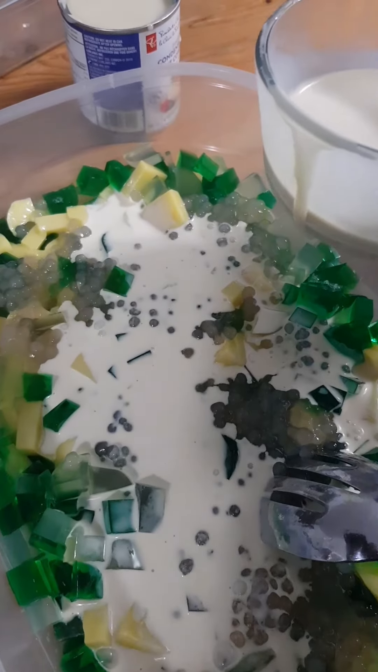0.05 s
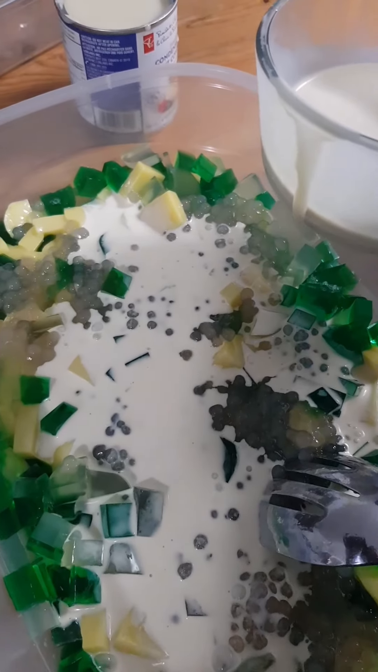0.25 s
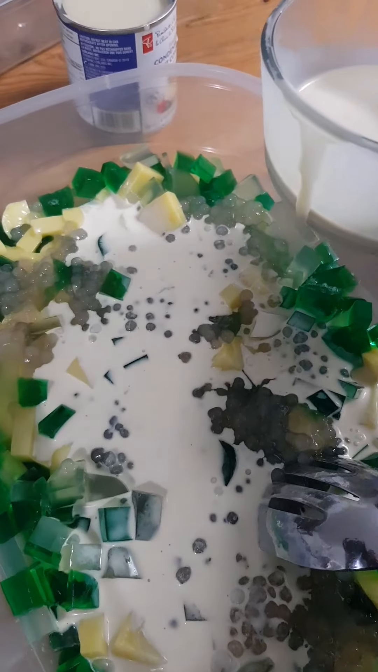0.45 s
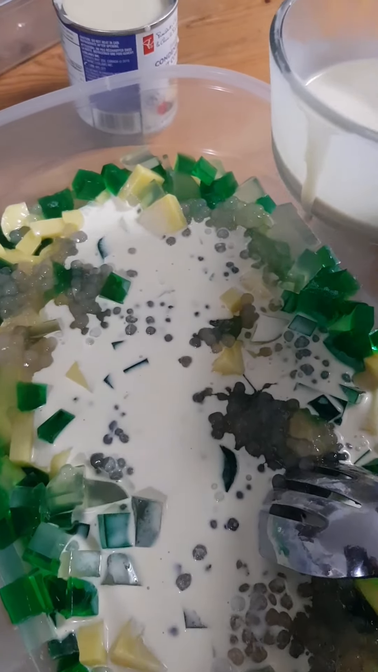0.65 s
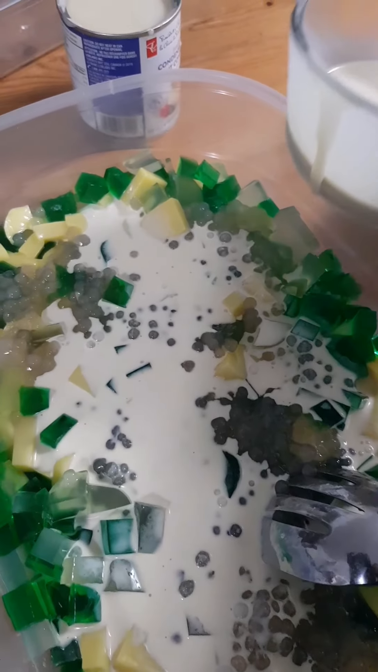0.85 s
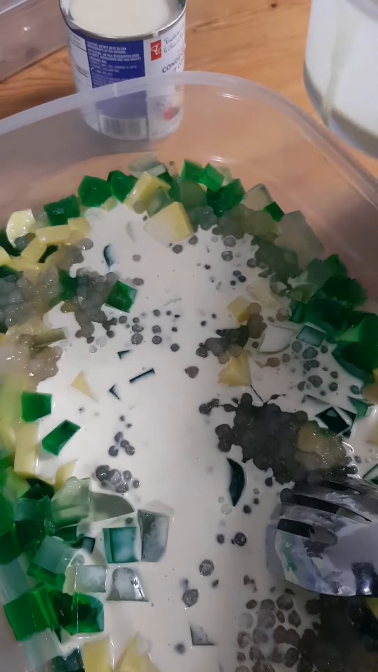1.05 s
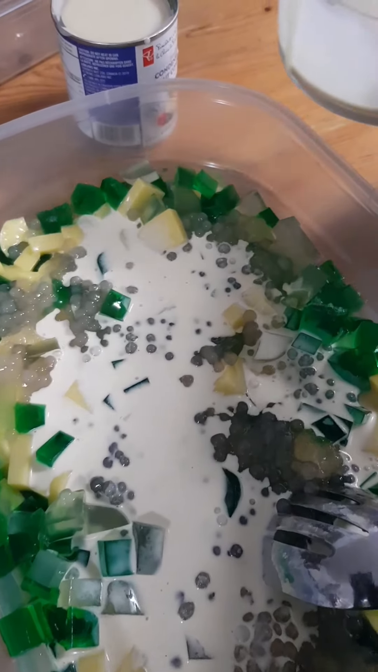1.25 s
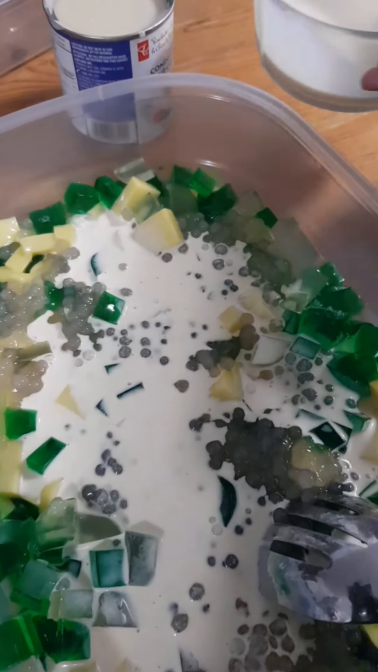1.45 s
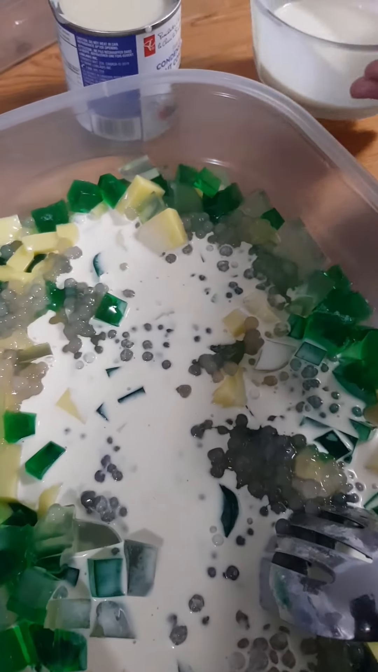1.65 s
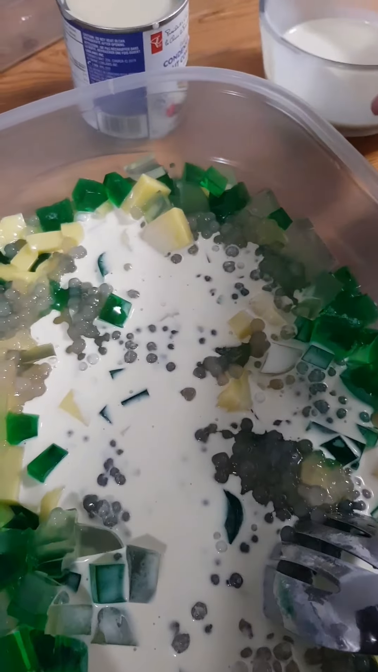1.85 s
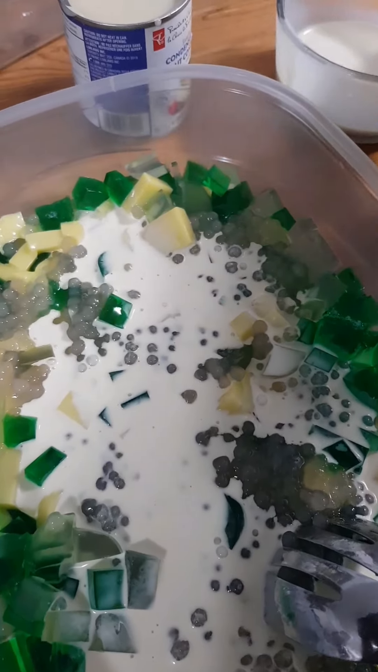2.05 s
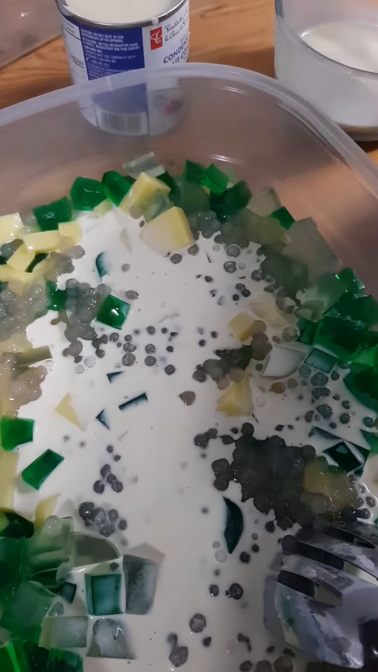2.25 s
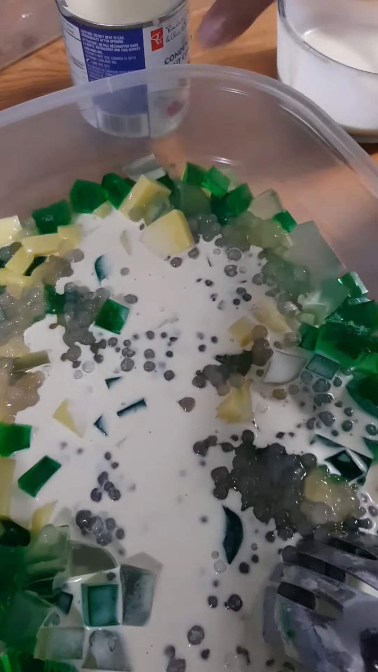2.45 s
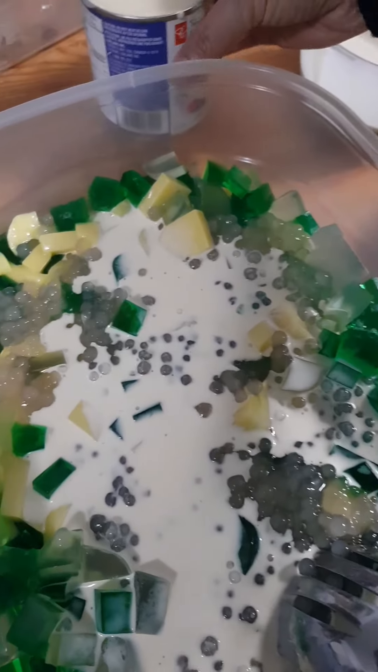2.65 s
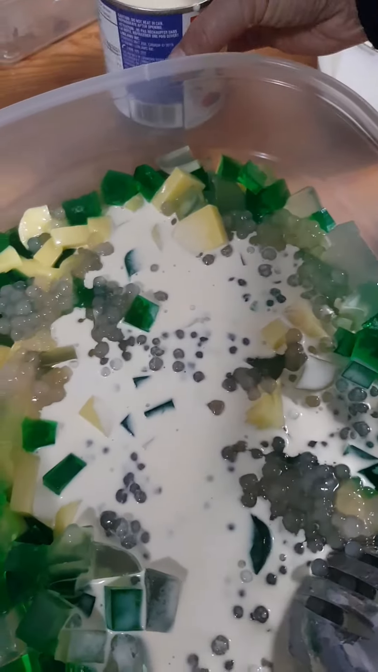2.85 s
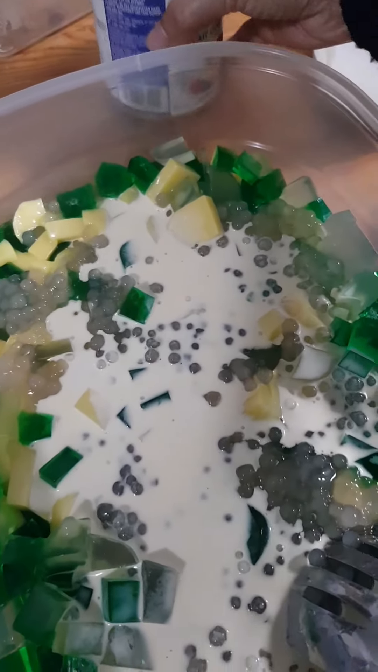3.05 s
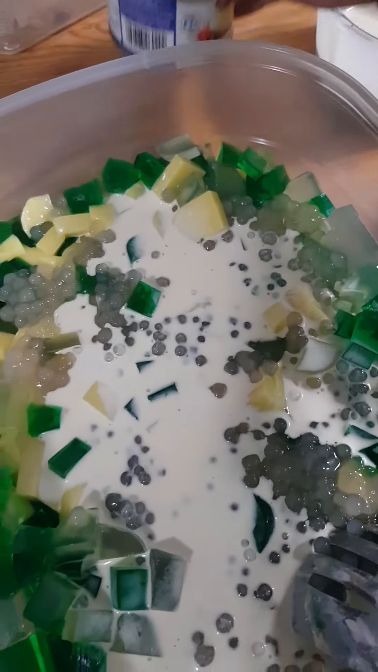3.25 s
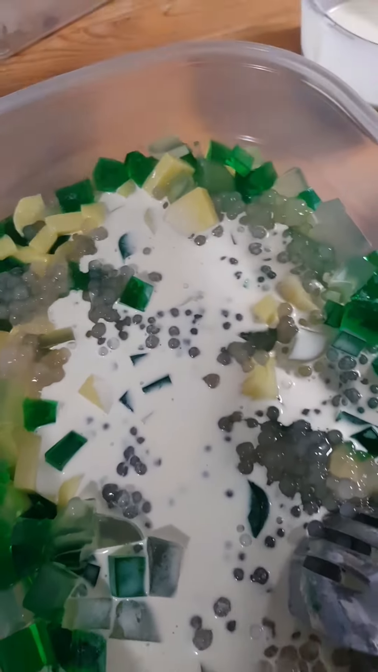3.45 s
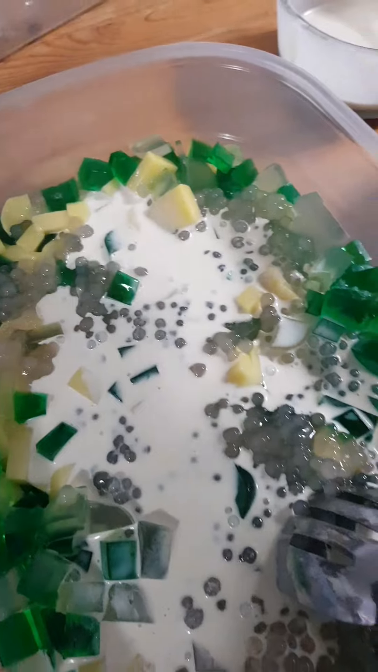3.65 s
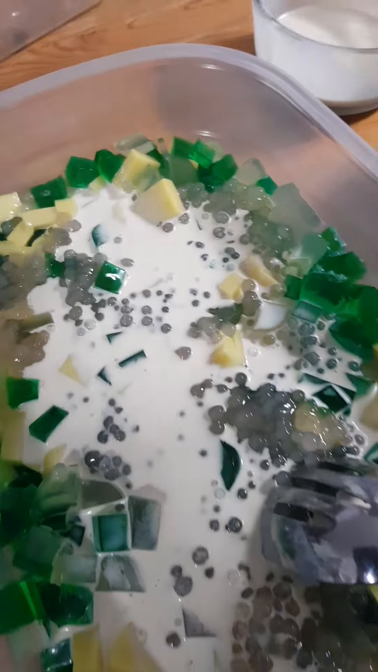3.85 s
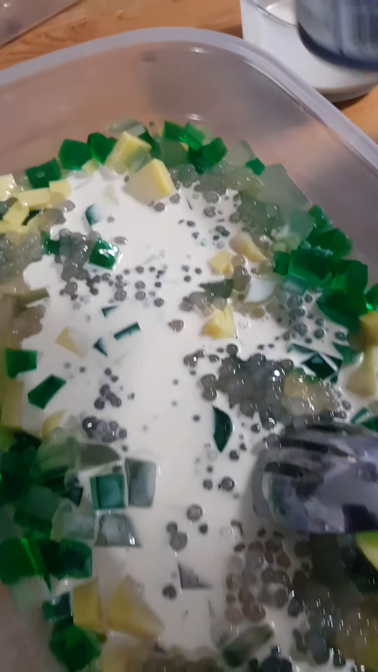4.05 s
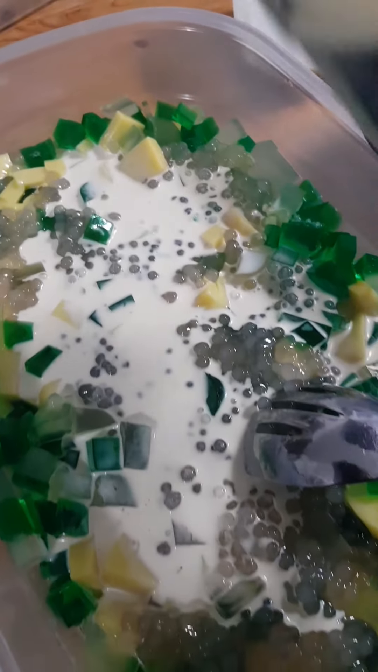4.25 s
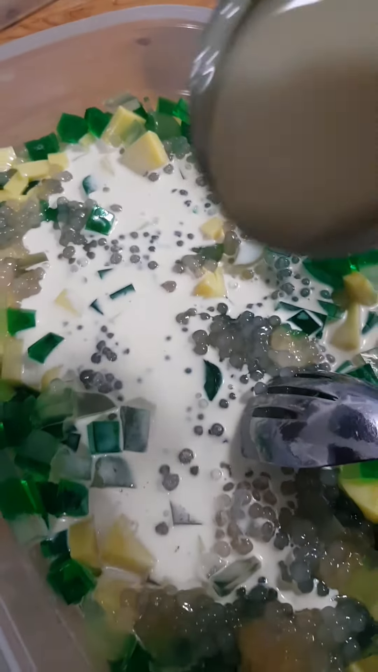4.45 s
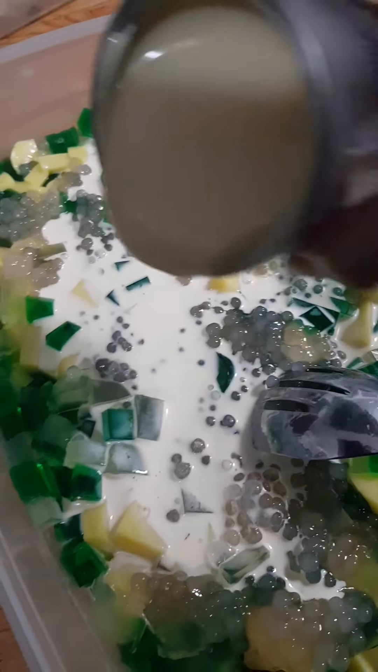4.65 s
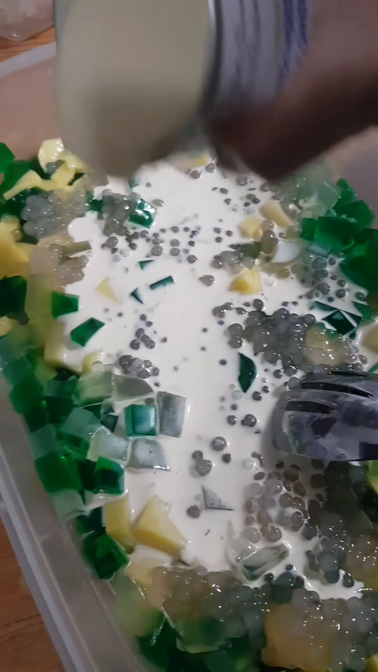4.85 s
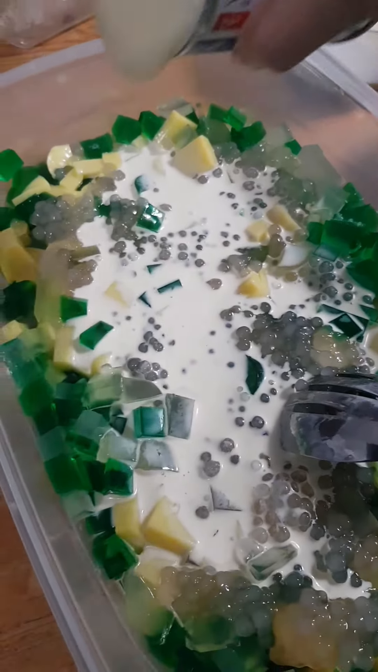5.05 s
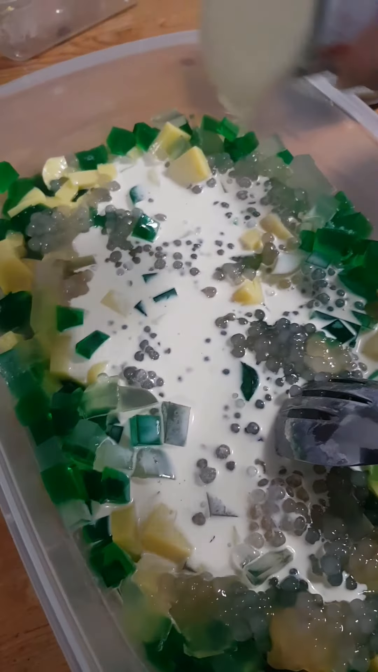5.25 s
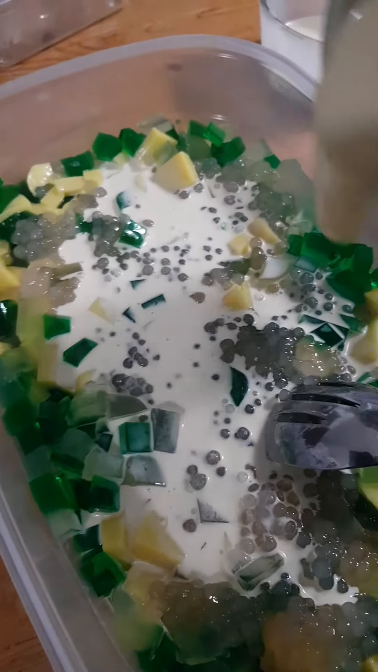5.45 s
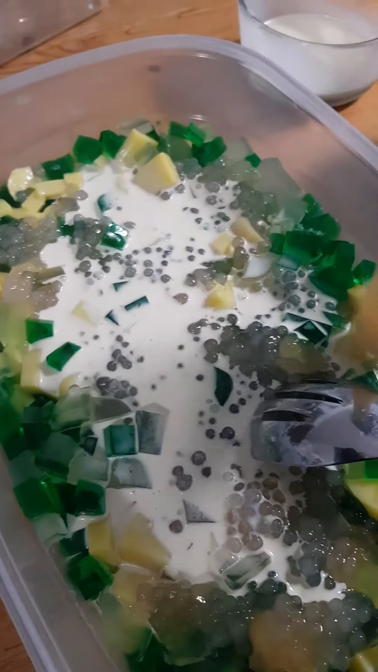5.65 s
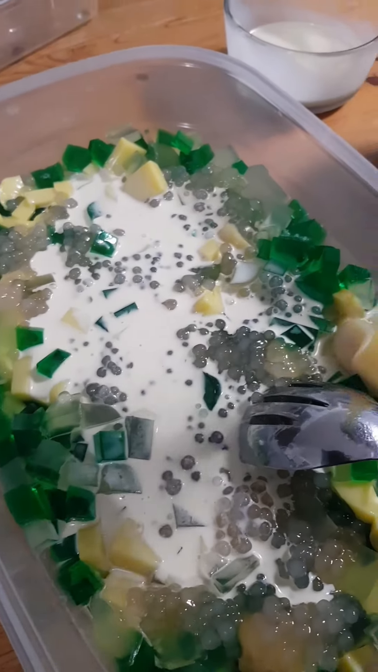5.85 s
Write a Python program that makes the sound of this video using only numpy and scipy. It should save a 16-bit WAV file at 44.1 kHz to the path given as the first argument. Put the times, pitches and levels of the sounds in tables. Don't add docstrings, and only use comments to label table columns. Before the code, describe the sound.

A quiet small kitchen, heard in stereo from close to the edge of a wooden table. A low, gently fluctuating fridge drone and soft hiss run throughout, with an extremely faint high whistle at times. Around 1.15 s a sleeve slides softly, and at 1.6 s there is a tiny glass tick. At 1.87 s a full glass bowl lands: one loud, abrupt, woody knock with a slight gritty edge, dying in about a tenth of a second. Softer rocking thuds follow at 1.89-2.1 s, the last ones bunched together. At 2.55-2.59 s fingers meet an open tin: a crisp double click, thin and hollow. A dull rub follows near 3 s. After the knock the background sinks slightly, recovering just after 4.1 s. Faint rubs and muted thin-metal dents occur at 4.2-4.45 s, then tiny ticks and airy brushing around 5.7-5.9 s. Hard walls add a short, dense echo.

```python
import sys
import numpy as np
from scipy import signal
from scipy.fft import rfft, irfft
from scipy.io import wavfile
from scipy.ndimage import uniform_filter1d

SR = 44100
rng = np.random.default_rng(int(sys.argv[2]) if len(sys.argv) > 2 else 0)


def store_pcm(level_fs):
    pcm = np.round(np.clip(level_fs, -1, 1) * 32767).astype(np.int16)
    wavfile.write(sys.argv[1], SR, np.atleast_2d(pcm).T)


def volts_from_db(level):
    exponent = np.asarray(level, float) / 20
    return 10 ** exponent


N = 261072


def on_log(table, hz, column):
    t = np.array(table, float)
    return np.interp(np.log(np.maximum(hz, 1)), np.log(np.maximum(t[:, 0], 1)), t[:, column])


def level(x, db):
    return x * volts_from_db(db) / np.sqrt(np.mean(x ** 2))


def walk(rate):
    k = int(SR / rate)
    held = np.repeat(rng.standard_normal(N // k + 1), k)
    return uniform_filter1d(uniform_filter1d(held, k), k)[:N]


# pitch_hz, likeness (0-1)
STEREO_LIKENESS = [(60, 0.5), (130, 0.86), (290, 0.9), (640, 0.3), (1410, 0), (3100, 0), (6820, 0),
                   (15000, 0)]


def pair(n, shape):
    hz = np.arange(n // 2 + 1) * SR / n
    likeness = np.clip(on_log(STEREO_LIKENESS, hz, column=1), 0, .99)
    share = np.sqrt([(1 + likeness) / 2, (1 - likeness) / 2])
    mid, side = rfft(rng.standard_normal((2, n))) * shape(hz) * share
    return irfft(np.array([mid + side, mid - side]), n)


def octave_bell(hz, centre_hz, width_oct):
    return np.exp(-(np.log2(np.maximum(hz, 1) / centre_hz) / width_oct) ** 2)


def peak(centre_hz, width_hz):
    return lambda hz: 1 / (1 + ((hz - centre_hz) / width_hz * 2) ** 2) ** 1.1


def add(out, x, s):
    i = int(s * SR)
    out[:, i:i + x.shape[1]] += x[:, :N - i]


def sides(pan_db):
    return volts_from_db(np.array([[pan_db], [-pan_db]]) / 2)


def ramp(t, start, length):
    return np.clip((t - start) / length, 0, 1)


SHAFT_ORDERS = (1, 3, 5, 6, 7, 8, 12, 13, 15)
SHAFT_LEVELS_DB = (-62, -73, -68, -73, -66.5, -82, -89, -90, -90.5)
# pitch_hz, level_db (rms), flutter_db
CASING = [(210.9, -52.5, 2), (246.3, -66, 5), (158, -70.5, -2), (86, -67.5, 2.5), (43, -70, 3)]
# start_s, length_s, level_db (rms)
WHISTLE = [
    (-.05, .8, -97.5),
    (.5, 0.32, -94),
    (.8, .45, -96),
    (4.4, 0.24, -97),
]
# pitch_hz, level_db (per Hz)
RUMBLE = [(12, -49), (20, -38.5), (65, -3.5), (85, -9.5), (130, -15), (160, -12), (187, -2.5), (214, -8),
          (259, -8), (340, -13.5), (420, -14), (606, -25), (693, -28.5), (1020, -34.5), (2000, -52),
          (2600, -77.5), (4400, -120)]


def fridge():
    t = np.arange(N) / SR
    shaft_hz, whistle_hz, whistle_rest_db = 58.855, 5464, -106
    turn = 2 * np.pi * np.cumsum(shaft_hz * (1 + 0.00339 * walk(1.991))) / SR
    tones = np.zeros(N)
    for order, db in zip(SHAFT_ORDERS, SHAFT_LEVELS_DB):
        tones += volts_from_db(db + 2.8 * walk(5)) * np.sin(order * turn + 7 * rng.random())
    for hz, db, flutter_db in CASING:
        tones += volts_from_db(db + flutter_db * walk(6)) * np.sin(2 * np.pi * hz * t + .4 * walk(6))

    swells = sum(volts_from_db(db) * np.sin(np.pi * ramp(t, s, length)) for s, length, db in WHISTLE)
    whistle = (volts_from_db(whistle_rest_db) + swells) * volts_from_db(1.8 * walk(9)) * np.sin(2 * np.pi * whistle_hz * t)

    swell, rumble = walk(0.57), 0
    for centre in 22 * 2 ** np.arange(0, 7.1, .5):
        band = pair(N, lambda hz: volts_from_db(on_log(RUMBLE, hz, column=1)) * octave_bell(hz, centre, 0.362))
        rumble = rumble + band * volts_from_db(0.643 * swell + walk(1.6))
    return np.sqrt(2) * (tones * sides(2.0) + whistle) + level(rumble, -56.5) * sides(0.51)


# pitch_hz, level_db (per Hz)
HISS = [(590, -18), (1000, -16), (1340, -2.5), (1500, -2.5), (2360, -6.5), (4680, -9), (5500, -7.5),
        (8260, -17), (12000, 0), (14900, 0.5), (16000, -5)]


def microphone_hiss():
    return level(pair(N, lambda hz: volts_from_db(on_log(HISS, hz, column=1))), -70) * sides(.8)


# start_s, length_s, level_db, pitch_hz
RUBS = [
    (1.148, 0.495, -71.5, 726),
    (2.55, 0.16, -75, 11000),
    (2.708, 0.107, -78.5, 6177),
    (2.969, 0.1215, -65, 700),
    (4.2, 0.42, -74, 600),
    (4.411, .1, -73.5, 1540),
    (5.685, 0.266, -80, 7730),
    (5.737, 0.092, -78, 6300),
    (5.843, 0.056, -70, 1000),
]


def rubs():
    out = np.zeros((2, N))
    for s, length, db, centre_hz in RUBS:
        n = int(length * SR) // 2 * 2
        rub = level(pair(n, peak(centre_hz, 0.74 * centre_hz)), db)
        add(out, rub * np.hanning(n) * volts_from_db(walk(40)[:n]), s)
    return out


def strike(contacts):
    bursts, pings = np.zeros((2, 2, N))
    n = 4096
    t = np.arange(n) / SR
    ears_t = t - np.array([[0], [.0002]])
    for s, tick_db, body, pitch, place_db in contacts:
        for centre_hz, width_hz, t60, db, pan_db in body:
            burst = level(pair(n, peak(pitch * centre_hz, pitch * width_hz)), 0)
            ping = np.sin(2 * np.pi * pitch * centre_hz * ears_t)
            clear = 1 / (1 + (4 * width_hz / centre_hz) ** 4)
            attack = 1 - np.exp(-t / 0.00038)
            fade = sides(place_db + pan_db) * attack * volts_from_db(tick_db + db - 60 * t / t60)
            add(bursts, (1 - clear) * burst * fade, s)
            add(pings, clear * ping * fade, s)
    return bursts, pings


# pitch_hz, width_hz, t60_s, level_db, pan_db (left minus right)
SPECK = [(4950, 1000, 0.021, 1.5, 0.5)]
GLASS = [(6396, 1400, .008, 0.2, 0), (4750, 1000, .009, -8, 0), (6840, 500, .04, -19, 0)]
TIN_RIM = [(3310, 9900, 0.014, 1.5, 1.54), (13400, 5100, .03, -15, 1.5), (990, 2800, 0.082, -4.5, 9.7),
           (4930, 1230, .02, -13, 2.5), (6470, 850, .028, -15, 6.5)]
TIN_BODY = [(510, 190, 0.06, -3, 5.5), (877, 210, 0.026, 3, -14.5), (1510, 2380, 0.031, 0, 6.5),
            (2720, 2400, 0.0205, -7.5, -3), (4030, 1200, 0.018, -7.5, -11),
            (9000, 15400, .0206, -16, -11.5)]
TIN_WASH = [(2200, 3220, .089, 0, 0)]
TIN_DENT = [(1010, 200, 0.04, 0, -2), (1725, 380, 0.0178, 2.5, -2), (1600, 3100, .071, -16, 5.5)]
# start_s, level_db, what rings, pitch factor, pan_db (left minus right)
CONTACTS = [(1.6255, -48.5, GLASS, 1.01, -7), (1.897, -45.5, SPECK, 0.88, -4.5),
            (2.053, -67.5, SPECK, 1.11, 9.5), (2.547, -47.5, TIN_RIM, 0.91, 4),
            (2.5515, -40, TIN_RIM, 0.92, -4.2), (2.577, -46, TIN_WASH, 0.64, -1.2),
            (2.579, -47.5, TIN_BODY, 1.05, 3), (2.585, -37, TIN_BODY, 0.973, -1.75),
            (3.535, -65, GLASS, .9, -8), (4.233, -52, TIN_DENT, 1.001, -8.5),
            (4.437, -52.5, TIN_DENT, 1.29, -3), (5.726, -57, SPECK, 2.18, -1.5),
            (5.727, -64.5, GLASS, 0.89, -14), (5.747, -55.5, GLASS, 1.03, -2.53),
            (5.748, -60.5, SPECK, 0.39, -4)]


def ticks():
    return strike(CONTACTS)


# pitch_hz, t60_s,
# landing_db, rocking_db, pan_db (left minus right)
TABLE_TOP = [(62, 0.12, -24, -31, -2), (95.4, 0.11, -14, -14.5, -9.5), (125.5, 0.093, 1.5, -6, 5.5),
             (192.8, .07, -10, -18, -2), (245.1, 0.064, -1, 6, 5.5), (313, 0.13, -28.5, -10, -9.5),
             (313.3, 0.023, 7, 1, 2.03), (365, 0.1836, 3, -13, 0.94), (505, 0.065, -17.5, -4, -10),
             (572, 0.13, -3, -14, -5.5), (610, 0.074, -13, -10.5, -10), (652.8, 0.059, -3, -13, -6),
             (701, 0.093, -10, -18, -10),
             (791.5, 0.1, -19.5, -16.5, -4.5), (822.4, 0.091, -12.5, -14, -2), (923, 0.043, -10, -16.5, -18.2),
          (1073, 0.079, -9.5, -13, 3.5), (1141, .08, -9, -8.5, -1), (1329, 0.036, -20, -7, 10),
          (1499.2, 0.08, -28.5, -25, 5.5), (1667, .08, -33, -34, -0.5), (1852.7, .07, -28.5, -36, -1.5),
          (2063, 0.066, -23.5, -31.5, -4.5)]
# pitch_hz, level_db
GRIT = [(300, -6), (800, -8.5), (1500, -1.5), (2200, -18), (3000, -31.5), (5500, -36), (8000, -41.5),
        (13000, -42.5)]
# start_s (of full force), level_db, contact_ms, rocking share (0-1)
BLOWS = [(1.8623, -38, 2.2, 0.2), (1.8665, -16.5, 0.655, 0.23), (1.892, -26, 0.45, 0.5),
         (1.9414, -31.5, 1.35, 0.68), (1.9886, -29, 1.78, 0.82), (2.03, -44.5, 2.16, 0.99),
         (2.056, -28.5, 2.8, .95), (2.0714, -26.5, 2.13, 0.7), (2.0786, -25.5, 2.84, 0.98),
         (2.0947, -38, 1.4, 0.8), (2.5871, -44.5, 1, 0.49)]


def bowl():
    out, t = np.zeros((2, N)), np.arange(SR // 3) / SR
    build = .0036
    hz, t60, land_db, rock_db, pan_db = np.array(TABLE_TOP).T[:, :, None]
    lead_ms = 0.3826 / (1 + (hz / 470) ** -3.0)
    sign = np.where(hz < 230, -1, 1)
    slow = np.clip(1.04 / hz - .005, 0, .02)
    for s, blow_db, contact_ms, rocking in BLOWS:
        share = np.clip(rocking, 0, 1)
        softness = 1 + (hz * contact_ms / 1300) ** 2.7
        gains = sign * volts_from_db(blow_db + land_db + share * (rock_db - land_db)) / softness
        scatter = rng.standard_normal(hz.shape) * np.clip((hz - 500) / 500, 0, 2)
        aside = 1 - 0.65 * share
        pitch = hz * (1 + share * .012 * rng.standard_normal(hz.shape))
        left = (t - build, aside * pan_db / 2)
        right = (t - build - aside * lead_ms / 1000, -aside * pan_db / 2)
        ring = []
        for late, side_db in (left, right):
            rise = np.sin(np.pi / 2 * np.clip((late + build) / (build + slow), 0, 1)) ** 2
            decay = volts_from_db(side_db - 60 * np.maximum(late, 0) / t60)
            modes = gains * rise * decay * np.cos(2 * np.pi * pitch * late + scatter)
            ring.append(np.sum(modes, axis=0))
        grit = pair(len(t), lambda f: volts_from_db(on_log(GRIT, f, column=1)))
        grit = grit * volts_from_db(-60 * t / 0.13) * np.clip(t / build, 0, 1) ** 2
        grit_db = blow_db + 6.5 - 11.5 * contact_ms
        add(out, np.array(ring) + volts_from_db(grit_db) * grit, s - build)
    return signal.sosfilt(signal.butter(3, 48, "high", fs=SR, output="sos"), out)


# pitch_hz, width_hz, t60_s, level_db, pan_db (left minus right)
FOOT = [(950, 500, 0.033, 0.1, 1.5), (620, 300, .03, -1.5, -3)]
# start_s, level_db
SLAPS = [
    (1.865, -30),
    (1.942, -42),
    (2.074, -44.5),
]


def foot_slaps():
    return strike([(s, db, FOOT, 1, 0) for s, db in SLAPS])


# pitch_hz, t60_s, level_db
KITCHEN = [(60, .3, -21), (250.4, 0.137, -9), (700, 0.24, -14), (2005, .3, -19.5), (6043, 0.21, -12.5),
           (14000, .15, -3.5)]


def kitchen(x):
    t, tail = np.arange(SR // 2) / SR, 0
    for centre in 45 * 2. ** np.arange(9):
        band = pair(len(t), lambda hz: octave_bell(hz, centre, 0.59))
        t60, band_db = on_log(KITCHEN, centre, column=1), on_log(KITCHEN, centre, column=2)
        tail = tail + band * volts_from_db(band_db - 60 * t / t60)
    tail = tail * ramp(t, .004, 0.004823) * volts_from_db(-16.5)
    both = tail.mean(axis=0)
    apart = signal.sosfilt(signal.butter(2, 250, "high", fs=SR, output="sos"), tail - both)
    return signal.fftconvolve(x.mean(axis=0)[None], both + apart, axes=1)[:, :N]


def scene():
    drone, rub = fridge(), rubs()
    tick_bursts, tick_pings = ticks()
    knock = bowl()
    slap_bursts, slap_pings = foot_slaps()
    dull = rub + knock + tick_bursts + slap_bursts
    pings = tick_pings + slap_pings
    return dull + pings + kitchen(dull + volts_from_db(-7.5) * pings) + drone


def band_limit(x):
    return signal.sosfilt(signal.butter(12, 16410, fs=SR, output="sos"), x)


def record(dry):
    t = np.arange(N) / SR
    knock_s, sink_s = 2.1, 0.99
    gain_db = -0.81 - 1.12 * ramp(t, knock_s, .1)
    gain_db += -1.08 * sink_s * ramp(t, knock_s, sink_s)
    gain_db += 1.84 * ramp(t, 4.13, 0.183)
    top_cut = signal.ellip(10, .2, 70, 15600, fs=SR, output="sos")
    mix = signal.sosfilt(top_cut, (dry + microphone_hiss()) * volts_from_db(gain_db))
    return band_limit(mix)


dry = scene()
out = record(dry)
store_pcm(out)
```